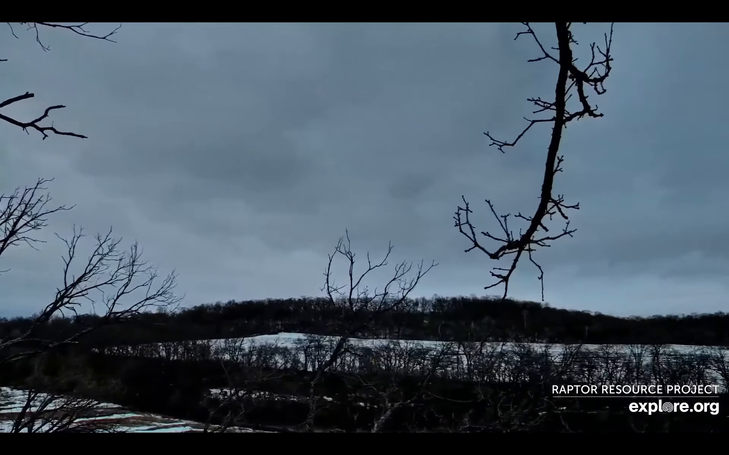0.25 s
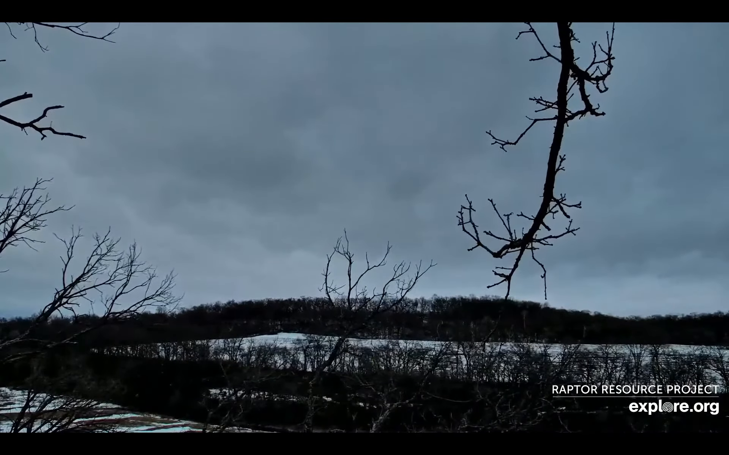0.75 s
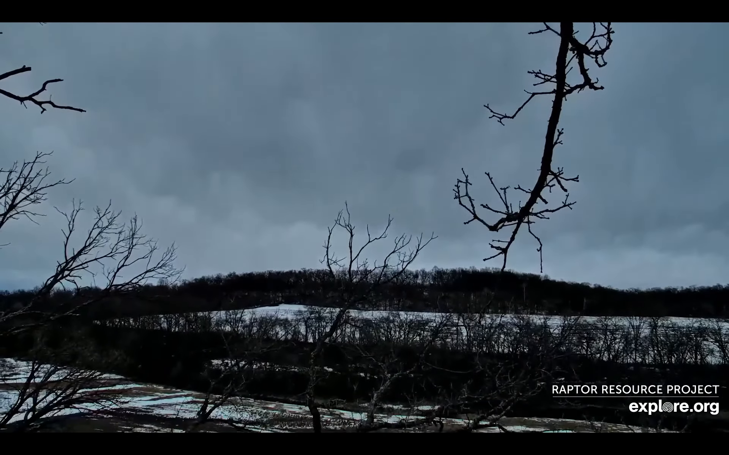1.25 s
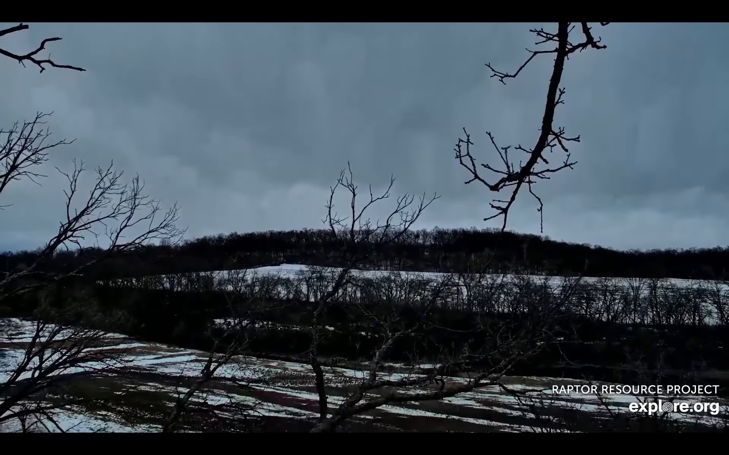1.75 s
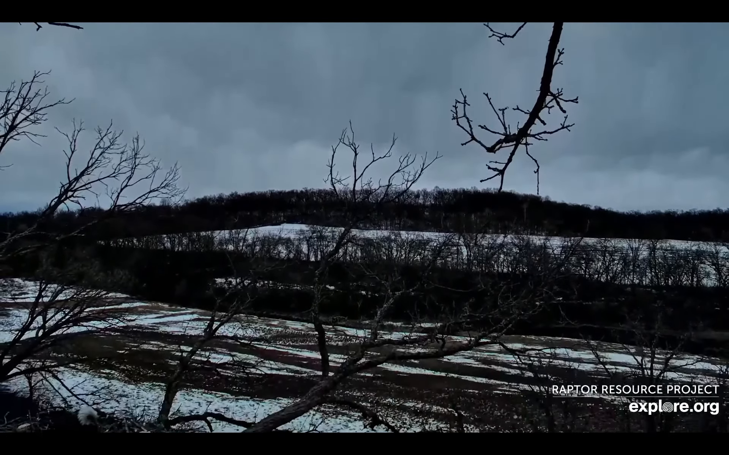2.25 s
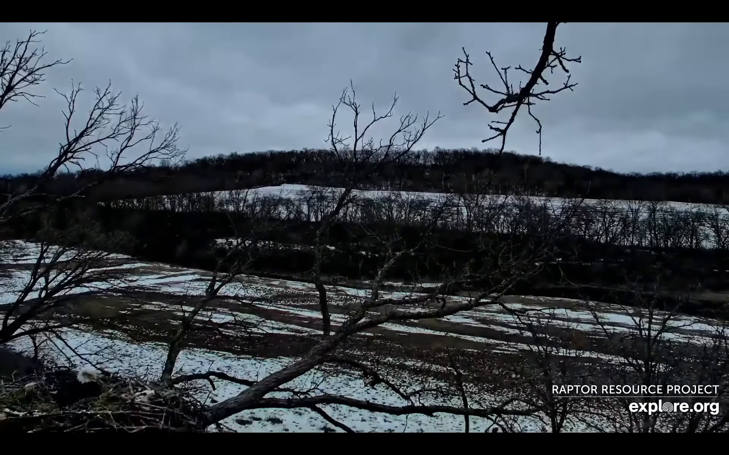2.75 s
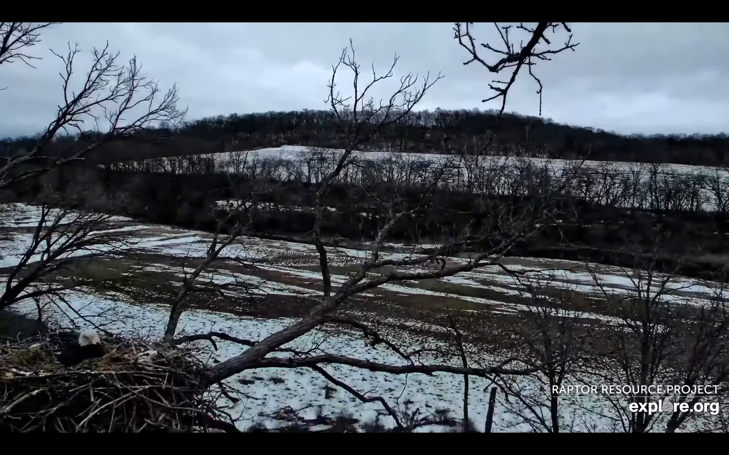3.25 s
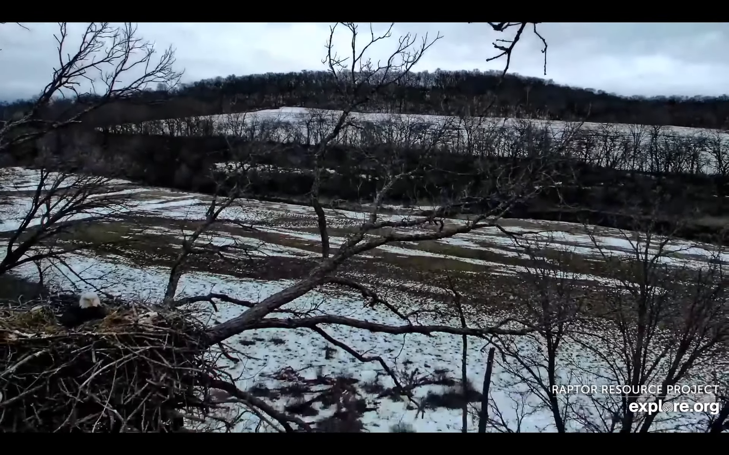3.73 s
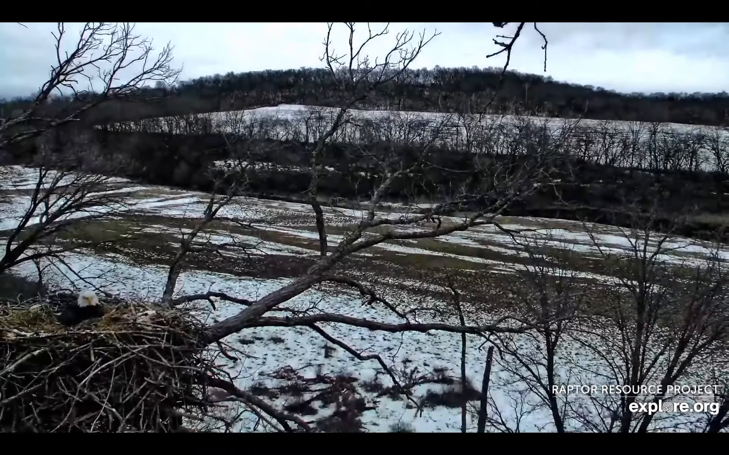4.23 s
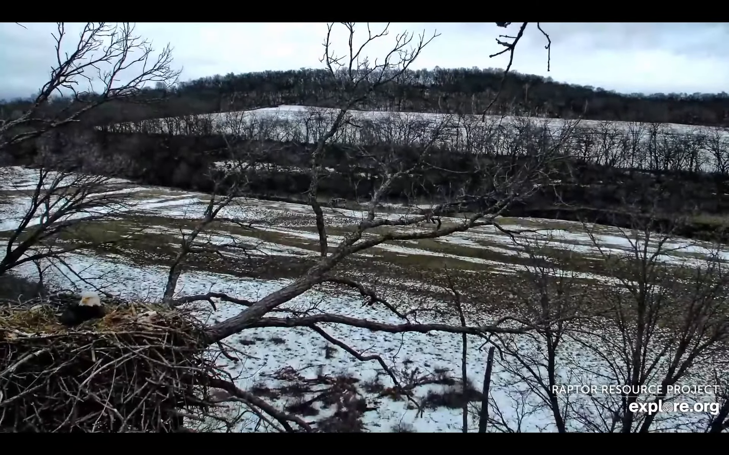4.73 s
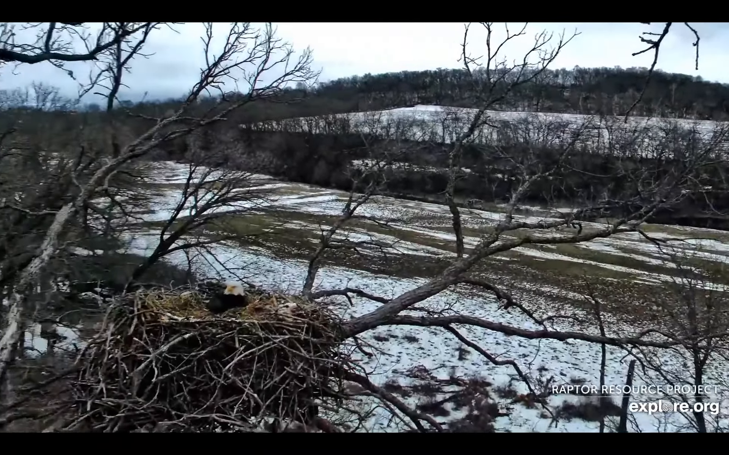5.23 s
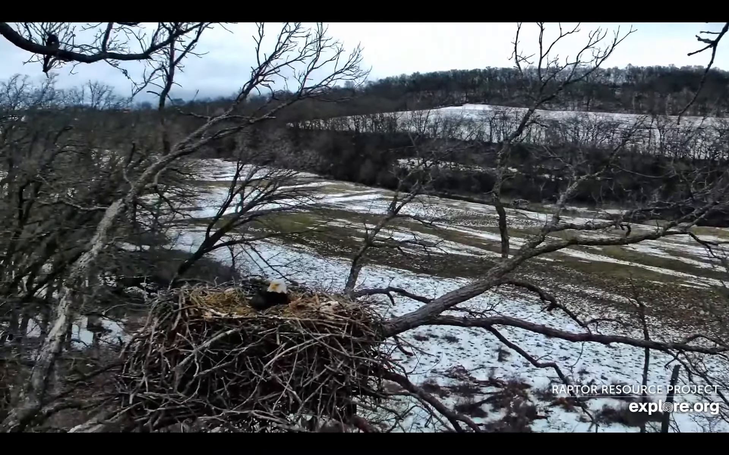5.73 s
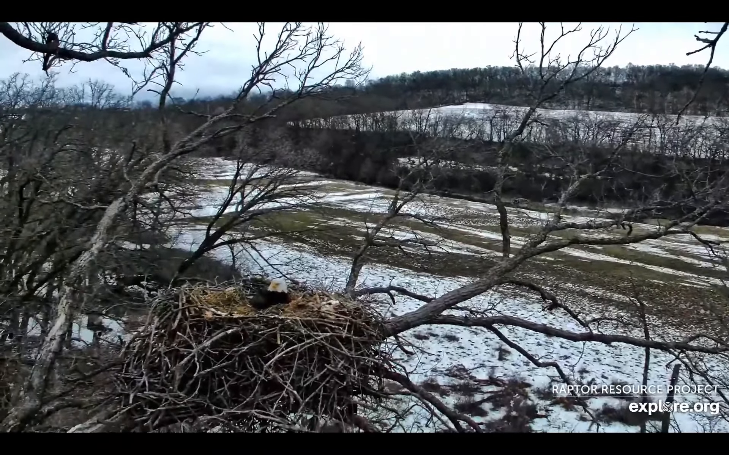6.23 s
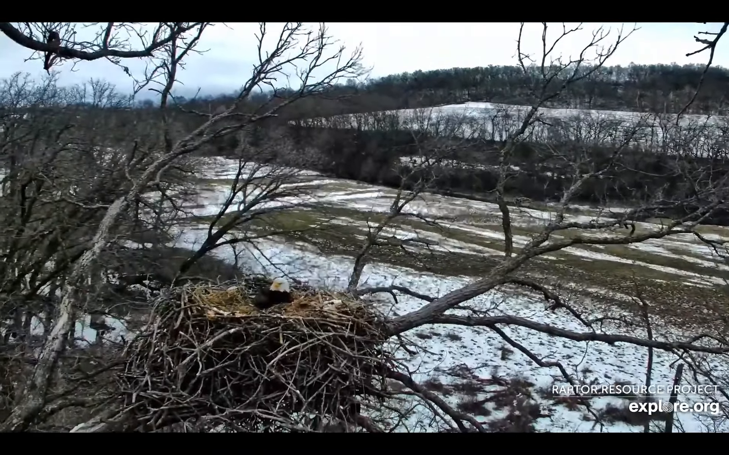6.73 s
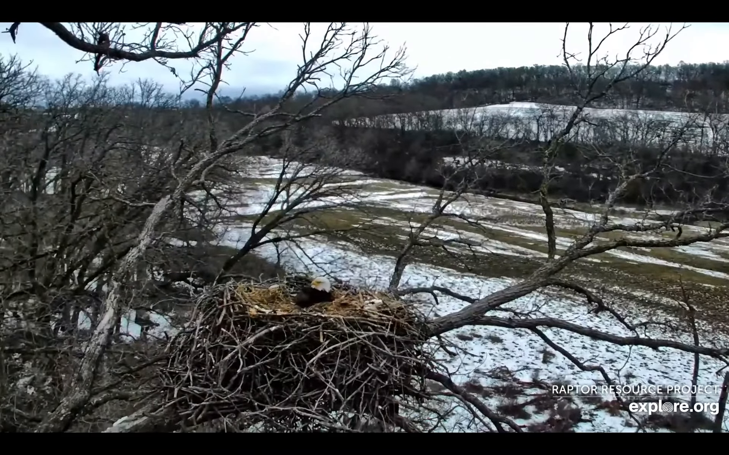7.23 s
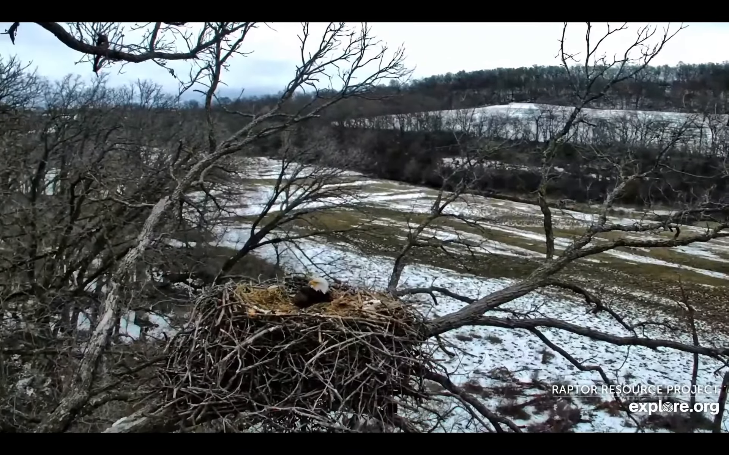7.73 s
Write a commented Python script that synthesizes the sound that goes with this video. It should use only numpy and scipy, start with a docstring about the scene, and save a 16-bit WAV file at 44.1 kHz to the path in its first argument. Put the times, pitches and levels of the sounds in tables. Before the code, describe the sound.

One bird sings busily in open, snowy woodland. Two harsh rasps and small squeaks come first, then soft warbles, a fast buzzing trill and sliding whistles. A loud three-note whistled figure repeats quickly nine times, mixed with raspy chatter. Thin pips, another run of rasps and quiet chuckling notes follow. Faint still air, low hum and slight tree echo; a fairly close outdoor microphone with slightly dulled top end.

```python
"""A small bird, probably a starling, sings a rapid three-note whistled figure, again and again.
Its two-sided voice box makes whistles from near-pure tones that slide in pitch: pips, slurs, a trill, warbles.
Rasps, squeaks and a buzz come from uneven pulses that ring the resonances of its throat.
The calls ring on briefly and the trees answer with a faint echo; behind are still air and a low mains hum."""
import sys
import numpy as np
from scipy import signal
from scipy.fft import rfft, irfft
from scipy.io import wavfile

SR = 44100
rng = np.random.default_rng(int(sys.argv[2]) if len(sys.argv) > 2 else 0)


def store_pcm(level_fs):
    """Save levels as 16-bit WAV."""
    pcm = np.round(np.clip(level_fs, -1, 1) * 32767).astype(np.int16)
    wavfile.write(sys.argv[1], SR, np.atleast_2d(pcm).T)


N = 351905
TIME = np.arange(N) / SR

# the figure, an arch then a rising and a falling chirp:
# [start of the rise t/s, arch length scale t/s, arch top f/Hz, rise f/Hz, effort level/dB]
FIGURES = [(2.928, 0.076, 2290, 3055, -2), (3.157, .066, 2244, 2825, 0), (3.373, 0.079, 2210, 2943, 0.2),
           (3.586, 0.075, 2145, 2955, -.5), (3.796, 0.064, 2114, 2886, 0.04),
           (4.012, 0.082, 2130, 2950, -1), (4.221, .07, 2150, 2803, -1.7), (4.438, 0.069, 2198, 2910, -2.5),
           (4.651, 0.069, 2140, 2795, -7.5)]
# levels at an effort of 0 dB; FOLLOWS is the dB gained for each dB of effort
ARCH_LEAD_S, ARCH_DB, ARCH_FOLLOWS = .068, -26.5, 0.73   # the arch's middle comes this long before the rise
RISE_S, RISE_DB = 0.02, -26
# the falling chirp fails first as effort drops; FALL_RATIO is its pitch over the arch's
FALL_LAG_S, FALL_S, FALL_RATIO, FALL_DB, FALL_FOLLOWS = .037, 0.021, 1.458, -25, 2.84

# rasping syllables: [middle t/s, level before the swell/dB]
RASPS = [(.017, -31), (.102, -32), (3.32, -39), (3.385, -36.5), (3.448, -35), (3.52, -36), (3.595, -36),
         (3.665, -36.5), (3.963, -33), (4.018, -31), (4.088, -31.5), (4.242, -31.5), (4.325, -39),
         (4.358, -36), (4.388, -31), (4.556, -34.5), (5.422, -42.5), (6.015, -34.5), (6.072, -32),
         (6.145, -32), (6.218, -31.5), (6.298, -33.5), (6.371, -33.5), (6.447, -34), (6.53, -36.5),
         (6.608, -38.5), (6.705, -38)]
# resonances of the throat in a rasp: [f/Hz, width f/Hz, level/dB]
RASP_THROAT = [(1326, 380, -6.5), (2676, 400, 3.5), (3650, 530, 2), (4820, 690, 4.5), (5350, 360, -3),
               (6880, 190, -5), (8050, 830, -9), (11100, 490, -16.5)]
# two rough tones at the core of a full-strength rasp: [f/Hz, level/dB]
RASP_TONES = [(2700, -5), (4820, -1)]
FULL_RASP_DB, TONES_FOLLOW = -32, 1.1   # the tones sink by this many dB for each dB that a rasp is softer
# the pulse rate bows over and sags through a syllable
RASP_BOW_OCTAVES, RASP_SAG_OCTAVES = .35, .5

# runs of scratches: [middle of the first t/s, middle of the last t/s, level/dB, fade by the end level/dB]
SCRATCH_RUNS = [(1.053, 1.19, -38, 0), (4.27, 4.42, -38.5, 0), (5.33, 5.41, -43.5, 2),
                (7.224, 7.458, -39.5, .5)]
# resonances of the throat in a scratch or a squeak: [f/Hz, width f/Hz, level/dB]
SCRATCH_THROAT = [(2170, 630, 0.5), (2543, 280, 1.5), (3470, 160, 1), (4620, 1180, 7), (6210, 550, -5),
                  (6730, 1100, -14), (10800, 1000, -18)]
SYLLABLE_GAP_S = .075   # about; the run is divided evenly before the slowing
RUN_SLOWING = .08   # gaps start this share shorter than their mean and end as much longer

# squeaks with a falling pitch: [middle t/s, mid pitch f/Hz, fall/octaves, level before the swell/dB]
SQUEAKS = [(.153, 887, 0.47, -39.5), (.226, 948, .4, -40), (3.893, 1155, 0.66, -35.5),
           (4.668, 1174, 0.41, -37), (5.311, 702, 0.32, -40.5), (5.356, 653, .2, -43.5),
           (5.924, 1180, .45, -35.5), (7.617, 1220, 0.38, -41.5), (7.69, 1290, 0.069, -40),
           (7.872, 1247, 0.47, -45.5)]
SQUEAK_S = .046

TRILL_START_S, TRILL_END_S, TRILL_GAP_S = 1.246, 1.777, .038
TRILL_DB, TRILL_UNEVEN_DB = -31.5, 1.5   # level before each blip's own; random spread
# blips of one trill beat: [lag t/s, length t/s, f/Hz, level/dB, fade/dB per s]
TRILL_BLIPS = [(-.011, .014, 3300, -6, 5), (0, .015, 2610, -3.5, 0)]
# the buzz under the trill swells to an early accent, then holds
BUZZ_START_S, BUZZ_S, BUZZ_ATTACK_S, BUZZ_RELEASE_S, BUZZ_DB = 1.21, .615, 0.028, 0.03, -43.8
ACCENT_S, ACCENT_WIDTH_S, ACCENT_DB = 1.355, 0.12, 6
# resonances of the throat in the buzz: [f/Hz, width f/Hz, level/dB]
BUZZ_THROAT = [(1770, 240, -10.5), (2420, 490, -2), (3290, 310, 0), (3730, 170, -9.5), (4820, 180, -5)]

# fast warbles: [start t/s, length t/s, first bottom pitch f/Hz, glide/Hz per s, swing f/Hz,
# level/dB, roughness/0-1]
WARBLES = [(0.527, 0.13, 1846, 3398, 754, -38.5, 0.21), (.635, .185, 1896, 800, 549, -41, .7),
           (1.769, 0.52, 2023, 50, 520, -42, .75), (1.837, 0.11, 3000, 2000, 1210, -46, 0.83),
           (2.378, .2, 2500, -2500, 1090, -43, 0.79)]
WARBLE_ATTACK_S, WARBLE_RELEASE_S = 0.039, 0.024

# long sliding whistles, one curve each: [t/s, f/Hz, level/dB]
SLURS = [
    [(2.44, 2452, -39.5), (2.484, 2136, -33), (2.536, 1770, -49), (2.59, 1510, -47)],
    [(2.626, 4560, -47), (2.644, 3700, -42.5), (2.672, 4036, -35.5), (2.684, 3950, -43)],
    [(2.8, 1633, -48), (2.834, 2030, -30.5), (2.87, 2090, -32.5), (2.892, 2580, -24), (2.896, 2530, -32),
     (2.906, 1980, -55)],
]
# short straight slides: [start t/s, length t/s, from f/Hz, to f/Hz, level/dB, roughness/0-1]
GLIDES = [(0.423, 0.036, 2480, 2700, -42, 0.47), (0.432, 0.024, 3030, 3090, -38.5, 0.34),
          (0.425, 0.019, 3600, 3850, -43, 0.1), (0.811, 0.12, 1360, 1381, -49, 0.08),
          (.815, 0.046, 4380, 4300, -52.5, 0), (1.181, 0.017, 2460, 2430, -33, 0),
          (1.191, 0.0092, 4800, 4880, -28.5, 0.24), (1.196, 0.01, 3860, 3060, -30.5, 0.16),
          (1.203, 0.018, 3850, 3760, -31.5, 0.96), (2.15, .095, 4000, 3540, -46, .3),
          (2.609, 0.017, 2280, 3350, -39.5, 0.6), (2.694, 0.028, 3850, 3230, -33.5, 0.12),
          (3.053, 0.082, 4120, 4030, -47, 0.07), (5.552, 0.082, 2620, 2490, -47, 0.48),
          (5.562, 0.069, 3950, 3880, -50.5, 0.53), (5.622, 0.033, 1047, 850, -46.5, 0.15),
          (5.961, 0.1, 1495, 1380, -41, 0.03), (6.123, 0.043, 1560, 1480, -38, 0.07),
          (6.327, 0.063, 1563, 1600, -39.5, 0.1), (6.384, 0.12, 1229, 1090, -49, 0.2),
          (6.55, 0.03, 1460, 1520, -43.5, 0.1), (6.672, 0.021, 9400, 9900, -46, 0.2),
          (6.681, 0.058, 7700, 7900, -49, .12), (7.158, 0.029, 686, 1000, -46.5, 0.15),
          (7.354, 0.094, 4560, 3900, -42, 0.78), (7.652, 0.16, 1290, 1279, -45.5, 0.15),
          (7.968, .03, 1950, 2200, -37, 0.36)]

# thin high pips: [start t/s, top pitch f/Hz, level/dB]
PIPS = [(2.903, 5450, -50), (2.98, 5580, -46.5), (3.084, 5550, -45.5), (3.764, 5750, -46),
        (3.847, 5750, -43.5), (4.621, 5450, -45), (4.996, 5550, -45.5), (5.081, 5470, -41.5),
        (5.17, 5600, -45), (5.761, 5750, -38), (5.847, 5720, -40), (6.664, 5850, -43.5)]
PIP_S, PIP_DROP = .025, .19   # PIP_DROP is the share by which a pip ends under its top

# runs of soft chuckles: [first start t/s, last start t/s, rough gap t/s, length t/s, f/Hz,
# upward bow/share, fall/share, level/dB]
CHUCKLE_RUNS = [(6.812, 7.62, .115, .052, 2760, .07, .02, -45.5),
                (6.778, 7.7, .102, .052, 2330, -.06, .02, -48.5),
                (6.786, 7.186, .1, .03, 4700, -.02, .09, -49)]

# soft falling chips: [start t/s]
CHIP_TIMES = [0.313, .858, 4.903, 5.087, 5.753]
CHIP_S, CHIP_FROM_HZ, CHIP_TO_HZ, CHIP_DB = 0.0193, 3150, 2350, -45.5

# faint ringing after the calls: [f/Hz]
RING_HZ = [1356, 3305, 4000, 4620, 6350]
# tone colour of the still air: [f/Hz, relative level/dB]
AIR = [(15, -43), (25, -11.5), (69, -11), (116, -21.5), (169, -10), (495, -2.13), (1350, -3), (3650, -10),
       (7800, -19), (15500, -27)]
AIR_DB, HUM_HZ, HUM_DB = -48.1, 118.6, -68.5
IMAGE_HZ, CUTOFF_HZ = 16000, 15750


def from_db(db):
    """Turn decibels into a plain gain."""
    return 10 ** (np.asarray(db) / 20)


def rms_one(x):
    """Scale a sound to an average strength (rms) of 1."""
    return x / np.sqrt(np.mean(np.abs(x) ** 2) + 1e-20)


def turn(hz):
    """Running phase of a moving frequency."""
    return 2 * np.pi * np.cumsum(hz) / SR


def wander(width_hz, size):
    """Slowly drifting complex noise, rms about 1; a larger width drifts faster."""
    r = np.exp(-np.pi * width_hz / SR)
    white = rng.standard_normal(size + SR // 4) + 1j * rng.standard_normal(size + SR // 4)
    # the first quarter second lets the filter settle
    smooth = signal.lfilter([1], [1, -2 * r, r * r], white)[SR // 4:]
    return rms_one(smooth)[:size]


def add(out, start, sound):
    """Lay a sound into the track at its time."""
    at = round(start * SR)
    sound = sound[max(-at, 0):max(N - at, 0)]
    out[max(at, 0):max(at, 0) + len(sound)] += sound


def along(rows):
    """Columns of a curve, sample by sample over its own span."""
    s, *columns = np.transpose(rows)
    times = np.arange(s[0], s[-1], 1 / SR)
    return [np.interp(times, s, c) for c in columns]


def clock(length):
    """Seconds since a sound began."""
    return TIME[:max(round(length * SR), 8)]


def swell(length):
    """A rounded rise and fall."""
    return np.sin(np.linspace(0, np.pi, max(round(length * SR), 8))).clip(0)


def envelope(t, attack, release):
    """A rounded attack, a hold and a rounded release."""
    rise = np.sin(np.pi / 2 * np.clip(t / attack, 0, 1))
    return rise * np.sin(np.pi / 2 * np.clip((t[-1] - t) / release, 0, 1))


def beats(first, last, gap):
    """Even times from the first to the last, about a gap apart."""
    return np.linspace(first, last, round(abs(last - first) / gap) + 1)


def whistle(hz, gain, jitter=.006, shimmer=.1, second_db=-36):
    """One side of the voice box: a near sine, slightly unsteady, with a faint octave."""
    size = len(hz)
    phase = turn(hz * (1 + jitter * wander(488, size).real))
    soft_ends = signal.windows.tukey(size, min(1, SR / 300 / size))
    gain = gain * (1 + shimmer * wander(640, size).real) * soft_ends
    return np.sqrt(2) * gain * (np.sin(phase) + from_db(second_db) * np.sin(2 * phase))


def throat(resonances, bend, pulse_hz, jitter, breath):
    """Uneven pulses and breath ring resonances that all bend together."""
    size = len(bend)
    cycles = np.floor(turn(pulse_hz * np.exp(jitter * wander(900, size).real)) / (2 * np.pi))
    pulses = rms_one(np.diff(cycles, prepend=0) * from_db(rng.normal(0, 1, size)))
    drive = pulses + breath * rng.standard_normal(size)
    out = 0
    for hz, width_hz, level_db in resonances:
        r = np.exp(-np.pi * width_hz * np.sqrt(2) / SR)
        # shift the resonance down to 0 Hz, filter there, and shift it back
        carrier = np.exp(1j * turn(hz * bend))
        ring = carrier * signal.lfilter([1], [1, -2 * r, r * r], drive / carrier)
        out = out + from_db(level_db) * rms_one(ring.real)
    return out


def arch(length, hz, level_db, drop=.32, width=.27, loudness=1.45, linger=0.233):
    """One push of breath lifts pitch and level together; it tops mid-way and lingers on the way down."""
    span = length * 1.5
    t = clock(span) - span / 2
    push = 1 / (1 + (t / (width * length * (1 + linger * (t > 0)))) ** 2 / 2) ** 2
    return whistle(hz * (1 - drop * (1 - push)), from_db(level_db) * push ** loudness)


def chirp(length, hz, level_db, scoop, settle, sag, attack, release, jitter):
    """The pitch starts off the note by a share (scoop), settles on it and sags as the breath stops."""
    t = clock(length)
    ratio = 1 + scoop * np.exp(-t / settle) - sag * (t / t[-1]) ** 4
    return whistle(hz * ratio, from_db(level_db) * envelope(t, attack, release), jitter=jitter)


def figures():
    """The three-note figure: breath-pushed arch, rise and fall; the first follows a slur and has no arch."""
    out = np.zeros(N)
    for start, length, hz, _, effort_db in FIGURES[1:]:
        note = arch(length, hz, ARCH_DB + ARCH_FOLLOWS * effort_db)
        # the middle falls ARCH_LEAD_S before the rise, so the note starts half its span earlier
        add(out, start - ARCH_LEAD_S - len(note) / SR / 2, note)
    for start, _, hz, rise_hz, effort_db in FIGURES:
        rise = chirp(RISE_S, rise_hz, RISE_DB + effort_db, scoop=-0.203, settle=0.0051,
                     sag=0.017, attack=0.004, release=0.0076, jitter=0.0034)
        fall = chirp(FALL_S, FALL_RATIO * hz, FALL_DB + FALL_FOLLOWS * effort_db, scoop=0.39, settle=0.0037,
                     sag=0.046, attack=0.0083, release=0.0053, jitter=0.014)
        add(out, start, rise)
        add(out, start + FALL_LAG_S, fall)
    return out


def rasps(table, resonances, tones, length, arch, pulse_hz, jitter, breath, colour_db=2.0, tone_jitter=0.017):
    """Harsh syllables: tones and resonances lift as the bill opens, pulses sag, each has its own colour."""
    out = np.zeros(N)
    for middle, level_db in table:
        opening = swell(length * np.exp(.05 * rng.standard_normal()))
        size = len(opening)
        through = np.linspace(-.5, .5, size)
        # the throat tunes up mid-syllable and ends a little lower than it began
        bend = (1 + arch * (opening - 1 - through)) * (1 + 0.0115 * rng.standard_normal())
        coloured = [(hz, width_hz, db + colour_db * rng.standard_normal()) for hz, width_hz, db in resonances]
        octaves = RASP_BOW_OCTAVES * (opening - 1) - RASP_SAG_OCTAVES * through + .2 * rng.standard_normal()
        voice = rms_one(throat(coloured, bend, pulse_hz * 2 ** octaves, jitter, breath))
        for hz, tone_db in tones:
            tone_gain = from_db(tone_db + TONES_FOLLOW * (level_db - FULL_RASP_DB))
            voice = voice + whistle(hz * bend, tone_gain, jitter=tone_jitter, shimmer=0.44)
        grain = rms_one(from_db(3 * wander(400, size).real))
        sound = from_db(level_db) * opening ** 0.94 * grain * rms_one(voice)
        add(out, middle - size / SR / 2, sound)
    return out


def syllables(runs):
    """Each run slows a little and may fade toward its end: rows of (middle s, level dB)."""
    rows = []
    for first, last, level_db, fade_db in runs:
        for done in np.linspace(0, 1, len(beats(first, last, SYLLABLE_GAP_S))):
            middle = first + (last - first) * done * (1 - RUN_SLOWING * (1 - done))
            rows.append((middle, level_db - fade_db * done ** 2))
    return rows


def squeaks(bow_octaves=.35):
    """Clearer syllables: regular pulses give a stack of partials that bows over and falls in the throat."""
    out = np.zeros(N)
    for middle, hz, fall, level_db in SQUEAKS:
        opening = swell(SQUEAK_S)
        size = len(opening)
        pitch = hz * 2 ** (bow_octaves * (opening - 1) - fall * np.linspace(-.5, .5, size))
        voice = throat(SCRATCH_THROAT, np.ones(size), pitch, jitter=.06, breath=.28)
        add(out, middle - SQUEAK_S / 2, from_db(level_db) * opening ** 0.58 * rms_one(voice))
    return out


def trill(dip=0.039, throb_db=3):
    """Quick pairs of whistled blips; a buzz from the other side of the voice box swells between beats."""
    out, buzz = np.zeros(N), np.zeros(N)
    centres = beats(TRILL_START_S, TRILL_END_S, TRILL_GAP_S)
    for centre in centres:
        for lag, length, hz, gain_db, fade_db_per_s in TRILL_BLIPS:
            shape = swell(length)
            faded_db = TRILL_DB + gain_db - fade_db_per_s * (centre - TRILL_START_S)
            level_db = faded_db + TRILL_UNEVEN_DB * rng.standard_normal()
            scoop = 1 + dip * (.8 - shape) + 0.018 * rng.standard_normal()
            blip = whistle(hz * scoop, from_db(level_db) * shape, jitter=0.015)
            add(out, centre + lag - length / 2 + rng.normal(0, .0008), blip)
    t = clock(BUZZ_S)
    now = BUZZ_START_S + t
    beat = 2 * np.pi * (now - TRILL_START_S) / (centres[1] - centres[0])
    accent_db = ACCENT_DB * np.exp(-((now - ACCENT_S) / ACCENT_WIDTH_S) ** 2)
    buzz_db = BUZZ_DB + accent_db + throb_db * np.sin(beat)
    bend = 1 + 0.092 * wander(213, len(t)).real
    voice = throat(BUZZ_THROAT, bend, pulse_hz=380, jitter=.13, breath=.05)
    add(buzz, BUZZ_START_S, from_db(buzz_db) * envelope(t, BUZZ_ATTACK_S, BUZZ_RELEASE_S) * voice)
    # cut the buzz steeply above 5250 Hz
    return out + signal.sosfilt(signal.ellip(8, .5, 50, 5250, fs=SR, output="sos"), buzz)


def warbles(per_s=48, hurry_per_s=38, settle_s=.12, under_ratio=.68, under_db=-4.5, top_dip_db=7, grit_db=-8):
    out = np.zeros(N)
    for start, length, start_hz, glide_hz_per_s, swing_hz, level_db, rough in WARBLES:
        t = clock(length)
        size = len(t)
        bottom_hz = (start_hz + glide_hz_per_s * t) * (1 + .15 * rough * wander(80, size).real)
        rate = (per_s + hurry_per_s * np.exp(-t / settle_s)) * np.exp(rough * wander(80, size).real)
        # 0 at the bottom of a V, up to 1 at its top
        height = np.minimum(2 * t / settle_s, 1) * np.abs(np.sin(turn(rate) / 2)) ** 1.5
        level_db = level_db + 2 * rough * wander(18, size).real
        # each voice is loudest at its own bottom
        upper_gain = from_db(level_db - top_dip_db * height)
        upper = whistle(bottom_hz + swing_hz * height, upper_gain, jitter=.07 * rough, shimmer=.7 * rough)
        lower_hz = under_ratio * (bottom_hz + swing_hz * (1 - height) / 2)
        lower_gain = from_db(level_db + under_db - top_dip_db * (1 - height))
        lower = whistle(lower_hz, lower_gain, jitter=.1 * rough, shimmer=.7 * rough)
        pulses = throat([(3570, 1500, 0)], np.ones(size), pulse_hz=310, jitter=0.98, breath=0)
        grit = rough * from_db(level_db + grit_db) * pulses
        add(out, start, envelope(t, WARBLE_ATTACK_S, WARBLE_RELEASE_S) * (upper + lower + grit))
    return out


def slurs():
    """Long whistles that slide through several pitches."""
    out = np.zeros(N)
    for rows in SLURS:
        hz, level_db = along(rows)
        add(out, rows[0][0], whistle(hz, from_db(level_db)))
    return out


def glides(flutter_hz=250, swing_hz=520, scatter_hz=420):
    """Short slides; a fast flutter of the membrane turns the rough ones into buzzes."""
    out = np.zeros(N)
    for start, length, from_hz, to_hz, level_db, rough in GLIDES:
        shape = swell(length)
        size = len(shape)
        flutter = turn(flutter_hz * (1 + 0.246 * wander(195, size).real))
        shake_hz = swing_hz * np.sin(flutter) + scatter_hz * wander(760, size).real
        hz = np.linspace(from_hz, to_hz, size) + rough * shake_hz
        gain = from_db(level_db) * shape ** 0.11 * (1 + 0.74 * rough * np.cos(flutter))
        add(out, start, whistle(hz, gain))
    return out


def pips():
    """Tiny high hooks: steeply up, a rounded top, and a longer leg steeply down."""
    out = np.zeros(N)
    shape = swell(PIP_S)
    through = np.linspace(-.9, 1, len(shape))
    for start, hz, level_db in PIPS:
        pitch = hz * (1 - PIP_DROP * np.abs(through) ** 3)
        add(out, start, whistle(pitch, from_db(level_db) * shape ** .25))
    return out


def chuckles(octave_db=-5):
    """Soft arched notes and dipping notes repeat out of step; each sounds with its lower octave."""
    out = np.zeros(N)
    for first, last, gap, length, hz, bow, fall, level_db in CHUCKLE_RUNS:
        shape = swell(length)
        pitch = hz * (1 + bow * (shape - 1) - fall * np.linspace(-.5, .5, len(shape)))
        gain = from_db(level_db) * shape ** 0.66
        for start in beats(first, last, gap):
            note = whistle(pitch, gain, jitter=0.03)
            low_note = whistle(pitch / 2, gain * from_db(octave_db), jitter=0.056)
            add(out, start, note + low_note)
    return out


def chips():
    """Soft, quick whistles that slide straight down."""
    out = np.zeros(N)
    shape = swell(CHIP_S)
    pitch = np.linspace(CHIP_FROM_HZ, CHIP_TO_HZ, len(shape))
    for start in CHIP_TIMES:
        add(out, start, whistle(pitch, from_db(CHIP_DB) * shape, jitter=0.045))
    return out


def ringing(x, ring_db=-1, t60=0.07):
    """Narrow resonances ring on after each call, dying by 60 dB in t60 seconds."""
    decay = from_db(-60 * TIME[:SR] / t60)
    tones = sum(np.sin(2 * np.pi * hz * TIME[:SR]) for hz in RING_HZ)
    ring = tones * decay * 2 / decay.sum()
    return from_db(ring_db) * signal.fftconvolve(x, ring)[:N]


def trees(x, t60=0.49, near_db=-15.5, near_t60=0.73, far_db=-18.5, dull_hz=6000):
    """Nearby branches scatter the song almost at once; the wood beyond returns a duller tail."""
    t = TIME[:SR]
    # sparse random echoes, none in the first 3 ms
    near = rng.standard_normal(SR) * (rng.random(SR) < .02) * from_db(-60 * t / near_t60) * (t > .003)
    far = rng.standard_normal(SR) * from_db(-60 * t / t60) * (1 - np.exp(-t / 0.01))
    far = signal.sosfilt(signal.butter(2, min(dull_hz, SR / 3), fs=SR, output="sos"), far)
    echo = (from_db(near_db) * rms_one(near) + from_db(far_db) * rms_one(far)) / np.sqrt(SR)
    return signal.fftconvolve(x, echo)[:N]


def background():
    """Still air is steady noise shaped in tone colour; the mains hum is one low tone that wavers in level."""
    hz, level_db = np.transpose(AIR)
    noise_hz = np.arange(N // 2 + 1) * SR / N
    colour = from_db(np.interp(np.log(noise_hz + 1), np.log(hz), level_db))
    air = rms_one(irfft(rfft(rng.standard_normal(N)) * colour, N))
    hum = np.sqrt(2) * np.sin(2 * np.pi * HUM_HZ * TIME) * (1 + 0.35 * wander(7.9, N).real)
    return from_db(AIR_DB) * air + from_db(HUM_DB) * hum


def scene():
    """The whole song, its ringing and echo, and the background."""
    chatter = rasps(RASPS, RASP_THROAT, RASP_TONES, length=.05, arch=0.0785,
                    pulse_hz=640, jitter=.065, breath=.17)
    scratches = rasps(syllables(SCRATCH_RUNS), SCRATCH_THROAT, [], length=.085, arch=0.21,
                      pulse_hz=680, jitter=.055, breath=.3)
    whistles = figures() + slurs() + glides() + pips() + chuckles() + chips()
    bird = whistles + chatter + scratches + squeaks() + trill() + warbles()
    return (bird + ringing(bird) + trees(bird) + background())[None]


def record(dry, image_db=-32):
    """Coarse resampling mirrors the sound faintly into the treble; the very top is cut."""
    mirrored = dry * 2 * np.cos(2 * np.pi * IMAGE_HZ * TIME)
    mirrored = signal.sosfilt(signal.butter(2, 12500, "high", fs=SR, output="sos"), mirrored)
    top_cut = signal.ellip(12, .1, 80, CUTOFF_HZ, fs=SR, output="sos")
    return signal.sosfilt(top_cut, dry + from_db(image_db) * mirrored)


dry = scene()
out = record(dry)
store_pcm(out)
```